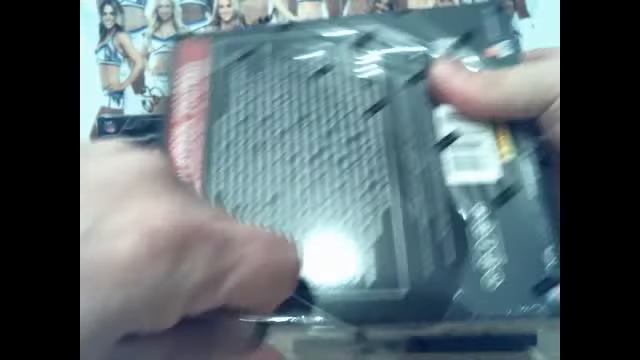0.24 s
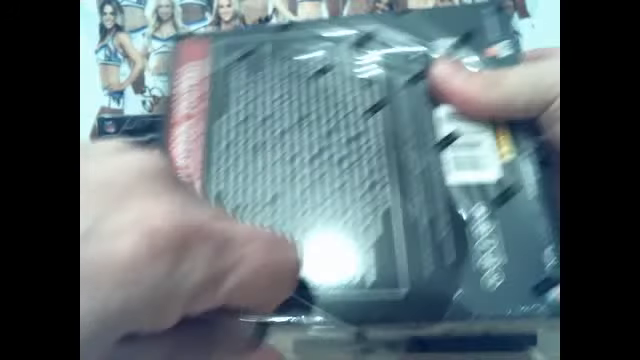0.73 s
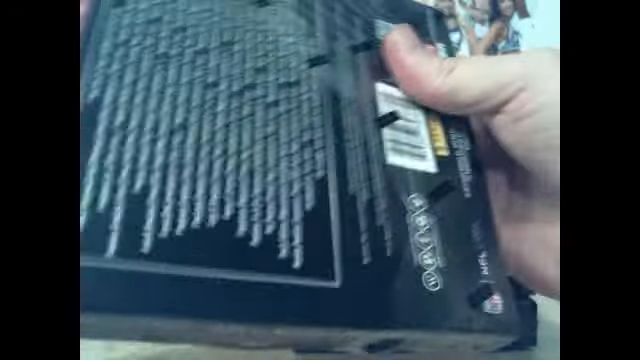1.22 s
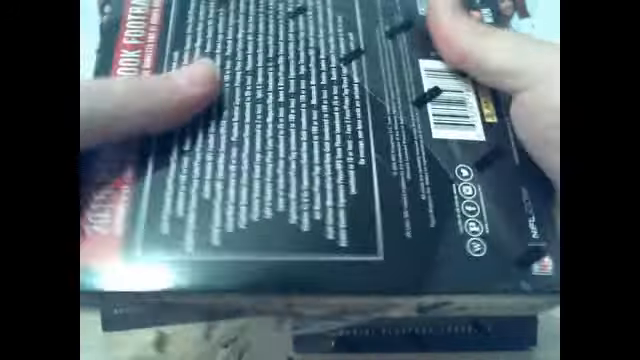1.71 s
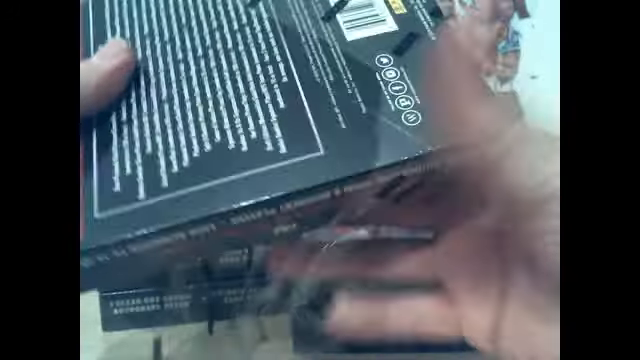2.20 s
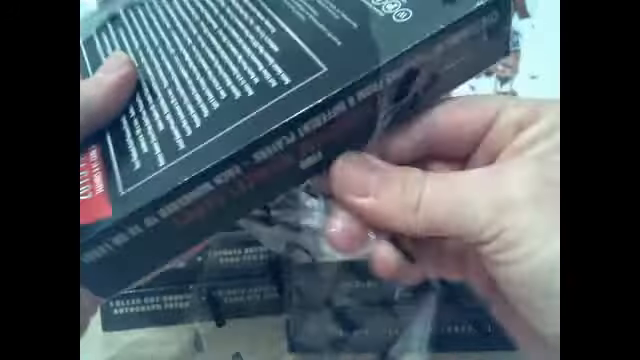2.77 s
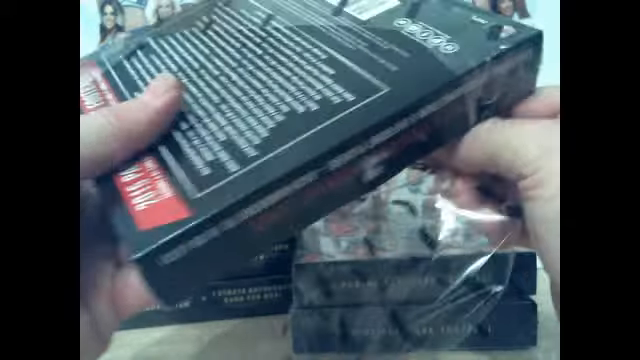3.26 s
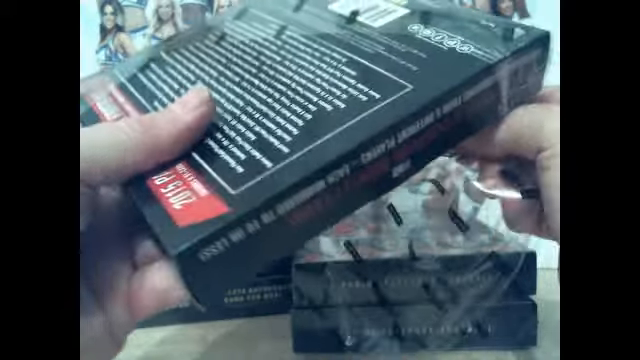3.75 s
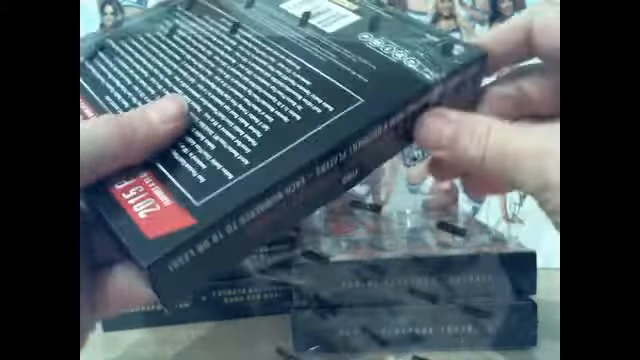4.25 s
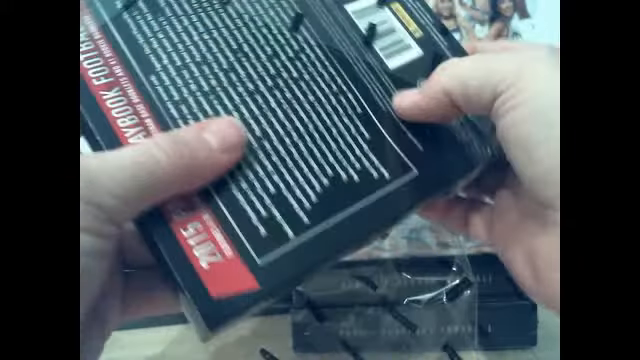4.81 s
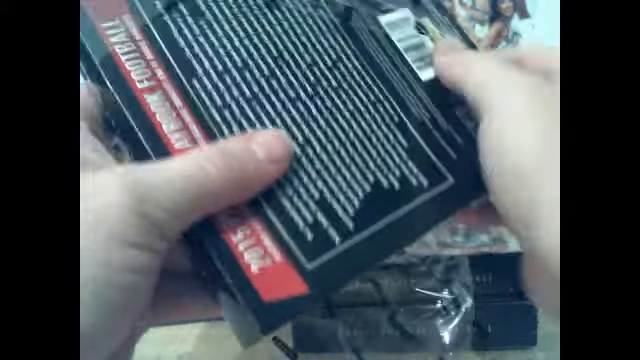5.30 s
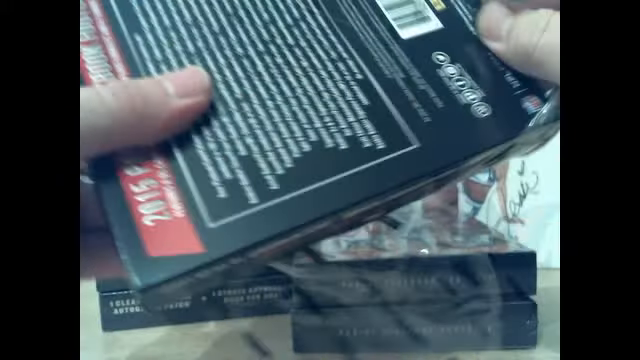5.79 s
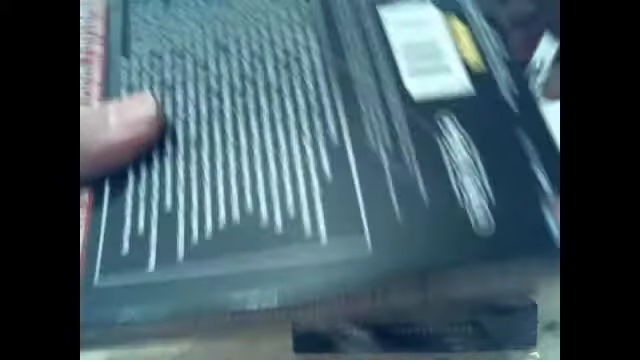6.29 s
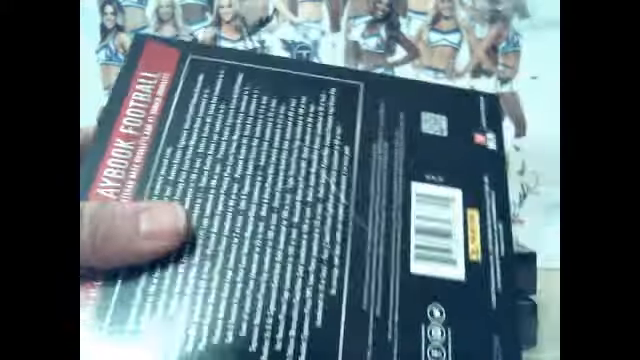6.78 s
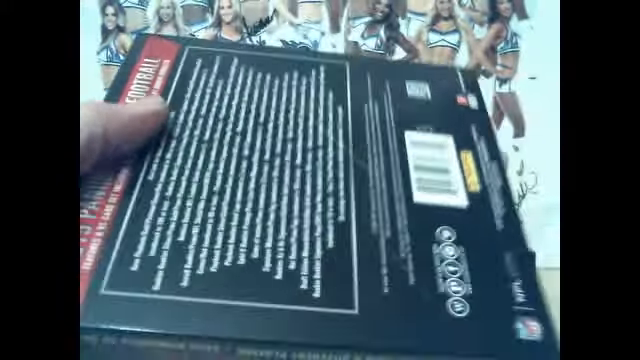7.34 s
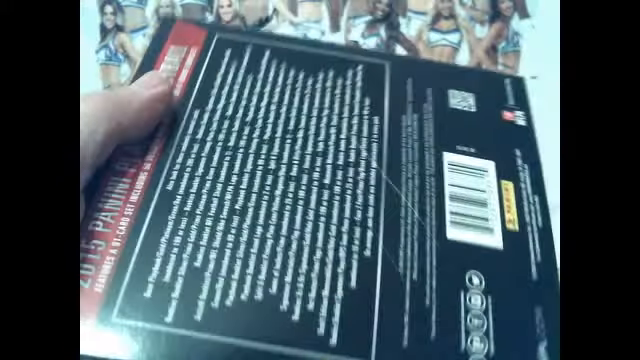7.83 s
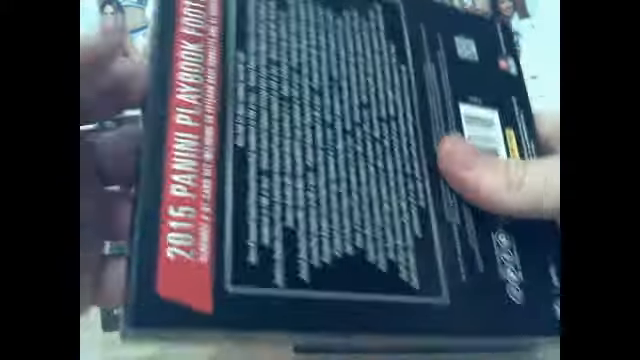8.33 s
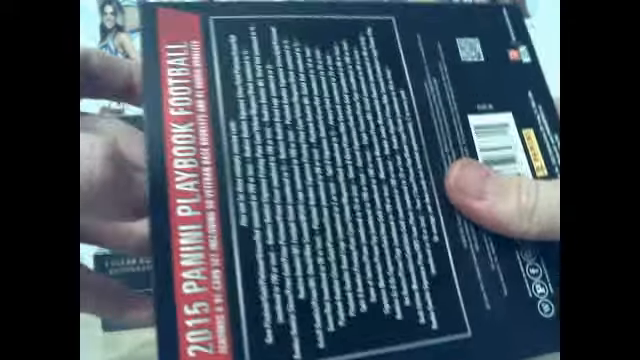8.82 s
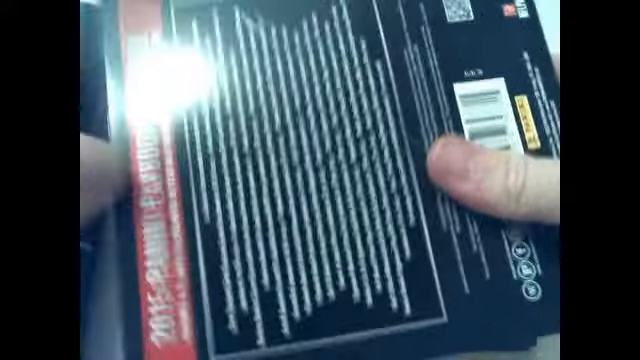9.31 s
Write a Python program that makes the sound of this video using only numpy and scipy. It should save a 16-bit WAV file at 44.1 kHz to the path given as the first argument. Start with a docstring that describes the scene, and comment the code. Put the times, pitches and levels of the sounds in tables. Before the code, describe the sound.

Close crackling of shrink-wrap being ripped from a cardboard box in short tugs, followed by fingers rubbing and bumping the lid open.

```python
"""Thin shrink film is picked, ripped and crumpled off a sealed cardboard box, close to a small microphone.
The film buckles: large creases snap singly, and countless tiny ones merge into a rustle.
Tugs and knocks excite the air cavity of the box, its walls flex with soft thumps, and fingertips
rub and squeak by stick-slip friction. At last the bare lid is eased open, over a quiet room rumble."""
import sys
import numpy as np
from scipy import signal
from scipy.fft import rfft, irfft, next_fast_len
from scipy.io import wavfile
from scipy.ndimage import uniform_filter1d

SR = 44100
rng = np.random.default_rng(int(sys.argv[2]) if len(sys.argv) > 2 else 0)


def bounce(signal):
    """Save signal as a 16-bit WAV file at the path given by the first command-line argument."""
    frames = np.transpose(np.atleast_2d(signal))
    limited = np.clip(frames, -1, 1)
    pcm = np.round(limited * 32767).astype(np.int16)
    wavfile.write(sys.argv[1], SR, pcm)


N = 421155

# Spectra of the room's rumble and hush, the film's broad folds and fine wrinkles, and rubbed card.
# Each row: frequency in Hz, relative spectral density in dB.
RUMBLE_SPECTRUM = [(13, -31.5), (22, 1), (27, 4), (43, -1), (123, -2), (141, -6), (173, -7.5), (190, -9),
                   (257, -10.5), (293, -13), (500, -19), (650, -42), (1100, -120)]
HUSH_SPECTRUM = [(180, -24.5), (300, 4), (511, -14.5), (656, -12), (1410, -5.5), (3700, -13.5),
                 (4370, -35.5), (10700, -24), (16000, -21.5)]
FOLD_SPECTRUM = [(700, -14.5), (1200, -8.5), (2200, -1.5), (3500, -2), (6000, -9), (9000, -14)]
WRINKLE_SPECTRUM = [(3500, -17.5), (6000, 0.5), (8000, -0.5), (10500, -1), (13000, -5), (16000, -26.5)]
CARD_SPECTRUM = [(150, -10), (300, -1), (500, -4), (600, 0), (690, -2), (800, -6.5), (1050, -8.5),
                 (1280, -8.5), (1800, -14), (3000, -22.5)]
# Finger movements. Each row: start in seconds, length in seconds, initial rustle level in dB,
# its change over the movement in dB, fine treble and card rubbing in dB relative to the rustle.
FINGER_MOVES = [(0, 0.19, -46, -3, -5.5, -2), (0.089, 0.29, -34.5, -16.5, -3, -2),
                (0.399, 0.067, -40.5, -3.5, -2.5, -2), (0.48, 0.12, -64.5, 15, -3.5, -3),
                (0.609, 0.13, -33.5, -22.5, -2, -1), (0.715, 0.22, -60, 8.5, 1, -3.5),
                (0.966, 0.16, -59.5, -3, 0.5, -3), (1.115, 0.2, -56.5, 5.5, 0, -3.5),
                (1.341, 0.089, -62.5, 1, -1, 1.5), (1.634, 0.13, -55, -2, -2, 1),
                (1.809, 0.076, -48, -18.5, -4, 0), (1.895, 0.11, -61.5, 3, -1, 0),
                (2.031, 0.053, -68.5, 15, 2.5, 1.5), (2.127, 0.046, -55, -12, 2, 2),
                (2.197, 0.03, -49.5, -8.5, 0, -4), (2.249, 0.11, -65, 8.5, 1, 1),
                (2.406, 0.14, -57, 6.5, -1, 0), (2.576, 0.27, -50, -3, -5, -1.5),
                (2.87, 0.046, -51.5, -11.5, 1, 0), (2.94, 0.13, -56.5, -0.5, 1, -8),
                (3.105, 0.067, -63, 0, -3, -1.5), (3.2, 0.18, -66, -3, -10, 0.5),
                (3.382, 0.12, -76, 8, -3, 9.5), (3.606, 0.14, -58.5, -1, -1.5, -5.5),
                (3.727, 0.048, -38, -13, -4.5, -4.5), (3.777, 0.094, -60, 7.5, -8, -1.5),
                (3.9, 0.099, -73, 4, -14, 4.5), (4.051, 0.23, -54.5, -2.5, -4.5, -3),
                (4.37, 0.068, -62, -15, -4, 2), (4.428, 0.062, -58, 2, -7, 2),
                (4.526, 0.059, -71, 9, -6, 8), (4.605, 0.14, -55.5, -9.5, -2, 2.5),
                (4.844, 0.11, -58, -6, -6, 2.5), (5.013, 0.17, -55.5, 1, -1, 0),
                (5.193, 0.3, -59.5, 0, -5, -4), (5.51, 0.13, -48.5, -21, -13, -4),
                (5.641, 0.15, -69, 16.5, -2.5, -2.5), (5.813, 0.09, -40, -22, -7, 11),
                (5.893, 0.17, -51.5, 4, -5.5, -2.5), (6.049, 0.15, -34, -9.5, -6, -8),
                (6.197, 0.3, -42, -2.5, 0, -5.5), (6.543, 0.29, -47, -10.5, -2.5, -23),
                (6.854, 0.11, -66.5, -1.5, -2.5, -5), (6.967, 0.24, -64.5, -7.5, -1.5, 1),
                (7.206, 0.12, -65, -6, -6, 3), (7.35, 0.16, -69, -12, 0.5, 4.5),
                (7.72, 0.16, -64.5, -5.5, -4.5, -0.5), (7.954, 0.086, -68.5, -10.5, -16, 0.5),
                (8.07, 0.12, -46.5, -22, -10, 6.5), (8.259, 0.15, -59.5, -10, -4.5, 0.5),
                (8.47, 0.2, -68.5, -6.5, -12, 12), (8.686, 0.14, -60.5, -13, -23.5, 11),
                (8.842, 0.057, -66, -13, -18, 23.5), (8.952, 0.044, -70.5, -0.5, -12.5, 11),
                (8.992, 0.16, -35.5, -32.5, -18, 8), (9.17, 0.045, -52, -7, -10.5, 1.5),
                (9.248, 0.11, -72, 4, -4.5, 0.5), (9.413, 0.094, -61, 5, -9.5, 0.5)]
# Levels between movements: rustle, fine treble and card rubbing, each in dB.
RESTING_DB = [-75.5, -83, -69.5]
# Tugs and knocks on the box. Each row: start in seconds, peak level of the cavity ring in dB,
# peak of the card's crack in dB relative to the ring.
BOX_KNOCKS = [(.092, -28, -4), (.108, -29, 2), (.145, -19, -10), (.236, -29.5, 3.5), (0.416, -35, 1),
              (.439, -28.5, 5), (.462, -28.5, 3.5), (.614, -7, -3), (.648, -24.5, 0.5), (1.69, -36.5, 1),
              (2.061, -39, -18), (2.498, -43, 12), (2.54, -39, -2), (2.751, -34, 7), (2.998, -41, 1.5),
              (3.06, -41.5, -7), (3.274, -41.5, 3.5), (3.729, -41, 0), (4.075, -38, 3), (4.497, -33, -5),
              (4.612, -31, 2.5), (5.005, -28.5, -14), (5.178, -41.5, 3), (5.515, -35, 14),
              (5.811, -26, -15), (5.825, -7, -9), (6.054, -28, 4), (6.072, -18, 6.5), (6.107, -15.5, 1.5),
              (6.344, -33, 6.5), (6.443, -31.5, 2.5), (6.486, -28.5, -4), (7.413, -53.5, -14.5),
              (7.455, -49.5, -15), (7.479, -45, -15), (8.098, -24.5, 0), (8.253, -27.5, -7.5),
              (8.381, -38.5, -28), (8.757, -35.5, -7), (8.845, -22.5, -38), (8.916, -37.5, -18),
              (8.996, -24, -13), (9.012, -22.5, -18), (9.039, -18.5, 10), (9.047, -14.5, -3),
              (9.197, -37.5, 2.5), (9.431, -38.5, -3.5)]
# Modes of the air in the box. Each row: frequency in Hz, relative level in dB, 60 dB decay time in seconds.
CAVITY_MODES = [(310, -14, .035), (490, -9, .055), (645, 0, .055), (720, -8, .045), (1200, -13, .03)]
# Creases that stand out as single snaps or ticks, first in the film, later in the lid.
# Each row: start in seconds, peak level of the body in dB, centre frequency in Hz,
# treble spit in dB relative to the body.
CREASE_SNAPS = [(.0943, -19, 4500, -18), (.099, -24.5, 4640, -12), (.1093, -16, 4300, -2),
                (.1283, -12, 7600, -5), (.1454, -1.5, 3440, -5), (.1543, -23.5, 3460, -24),
                (.2288, -25, 9500, -12), (.2414, -23, 3220, -1.5), (.2582, -24.5, 6170, -11),
                (.2954, -23.5, 2830, -7), (.349, -30.5, 9950, 4), (.4056, -23, 3860, -6),
                (.4171, -22, 1930, -6), (.4426, -27, 1980, -17), (.4634, -25.5, 8300, -11),
                (.6148, 3, 5620, -5), (.6237, -14, 2740, -15), (.647, -21.5, 9860, 4.5),
                (.6725, -23.5, 7200, -6), (.7393, -36, 8200, -10), (.8249, -35, 4800, -14),
                (.8373, -33, 7100, -15), (.873, -23.5, 7700, -4.5), (.9143, -29.5, 6890, -12),
                (.9474, -38, 6900, -6), (.9825, -30.5, 5740, -6), (1.0245, -33, 7440, -24),
                (1.1238, -33, 9170, -11), (1.1956, -34, 3370, -18), (1.237, -27.5, 3240, 0),
                (1.2644, -34, 6980, -23), (1.6458, -34.5, 2660, -1.5), (1.6907, -36, 1760, -11),
                (1.8211, -41, 1570, -1), (1.8576, -41, 6300, -15), (1.9378, -34.5, 2780, -4),
                (1.99, -36.5, 2240, -10), (2.1503, -34, 6700, -9), (2.2133, -31.5, 6800, -13),
                (2.4736, -32.5, 10600, -5), (2.4981, -31.5, 1450, -28), (2.5412, -36, 2740, -3),
                (2.6043, -31, 9730, -10), (2.6294, -29.5, 6000, -9), (2.6588, -30, 6060, -8),
                (2.6776, -33, 7800, -9), (2.7165, -32.5, 10340, -12), (2.7513, -24, 2250, -0.5),
                (2.7705, -31, 10600, -7), (2.7843, -23.5, 9800, -12), (2.8253, -31.5, 8500, 0.5),
                (2.9354, -41.5, 4300, 5), (3.027, -32, 11020, -13), (3.0712, -34, 11100, -13),
                (3.1188, -38.5, 2580, 0), (3.1483, -34, 4130, -5), (3.2155, -35, 4050, 0.5),
                (3.251, -40.5, 4330, -9), (3.3464, -48, 6960, -1), (3.3746, -42, 4970, -0.5),
                (3.409, -39.5, 2950, -8), (3.4332, -36.5, 1490, 2), (3.47, -39, 4560, -5),
                (3.4933, -35.5, 2610, -6), (3.5404, -43, 6750, -13), (3.585, -40.5, 2230, -8),
                (3.7328, -19.5, 3120, -6), (3.7491, -26, 5580, -5), (3.92, -44, 1800, 1.5),
                (3.9935, -36, 3450, -24), (4.0535, -42, 1520, -11), (4.0761, -34.5, 3790, -13),
                (4.232, -36, 4640, -8), (4.2509, -40, 2540, -5), (4.2674, -39, 10100, -17),
                (4.2803, -39, 1470, -13), (4.5322, -40, 4750, -20), (4.6135, -29.5, 1640, -8),
                (4.7376, -50, 3400, 1.5), (4.7507, -43, 3450, -5), (5.0064, -31, 1510, -18.5),
                (5.1796, -31, 3830, -5), (5.2594, -41, 7850, -25), (5.5167, -17, 2240, -18.5),
                (5.5259, -32, 2400, -34), (5.5925, -29, 2410, -5.5), (5.6366, -42.5, 6900, -13),
                (5.7794, -41, 3170, 3), (5.8129, -27, 1490, -15), (5.8283, -19, 1410, -10),
                (5.9156, -22, 3400, -5), (5.9597, -29.5, 3320, -25), (5.9693, -26, 3200, -17),
                (6.056, -24.5, 3490, -7), (6.0737, -14, 3320, -24), (6.0864, -26.5, 3060, -17),
                (6.1025, -11.5, 2740, -10), (6.1082, 2, 3730, -10.5), (6.1161, -14.5, 3840, -21),
                (6.1464, -19, 5450, -14), (6.177, -24.5, 7540, -17), (6.2254, -24, 4000, -14),
                (6.2412, -16, 5800, -14), (6.2583, -23, 4180, -8), (6.2877, -22.5, 4680, -22),
                (6.3329, -22, 5700, -6), (6.3522, -20, 7300, -7), (6.3824, -23, 5210, -3),
                (6.4452, -26, 3430, -1), (6.4946, -26, 1850, -10), (6.5607, -36, 3500, -15),
                (6.6215, -31, 5900, -15), (6.6808, -35, 5680, -16), (6.7154, -29.5, 4370, -4.5),
                (6.7286, -31.5, 5220, -11), (6.7651, -39, 3700, -17), (6.7987, -37, 3900, -18),
                (6.9, -46, 5410, -9), (6.968, -46.5, 5940, -6.5), (7.025, -47, 6000, -7),
                (7.241, -44, 1993, -5), (8.0754, -33, 2600, -5), (8.0994, -27.5, 1570, -8.5),
                (8.2548, -35, 1716, -9), (8.45, -50.5, 3000, -22), (8.756, -47.5, 5010, -6),
                (8.813, -58, 4960, -6), (8.827, -55, 3000, -13), (8.8461, -35.5, 1510, -25),
                (9.0031, -26.5, 7190, -12), (9.0236, -13.5, 3230, -25), (9.025, -15.5, 2070, -14),
                (9.0442, -12, 2330, -10.5), (9.2012, -41, 1744, -14), (9.435, -46.5, 2400, -4.5),
                (9.447, -45, 4000, -7), (9.5039, -36, 4200, -8.5)]
# Palm or table meeting the large walls. Each row: start in seconds, peak level in dB, frequency in Hz.
WALL_THUMPS = [(0.146, -42, 86), (0.409, -35.5, 133), (0.613, -38, 54), (0.668, -33, 59),
               (1.224, -35, 47.7), (1.401, -42, 59), (1.647, -33.5, 108), (1.692, -39, 52.4),
               (1.928, -43, 117), (2.057, -45, 43), (2.112, -41, 53.7), (2.539, -46.5, 113),
               (2.761, -41, 132), (3.727, -36, 231), (4.488, -46, 141), (4.61, -27.5, 264),
               (5.003, -43.5, 146), (5.724, -34, 152), (5.822, -15, 140), (6.051, -27.5, 267),
               (6.106, -20.5, 266), (6.265, -33.5, 225), (6.491, -36.5, 118), (8.104, -34, 37),
               (8.258, -40, 59), (8.697, -37, 138.5), (8.756, -42.5, 129), (8.786, -37, 200),
               (9.0, -33, 134), (9.04, -20, 193), (9.045, -25.5, 42), (9.13, -43, 44.8), (9.43, -41, 140)]
# Squeaky fingertip rubs. Each row: start in seconds, length in seconds, pitch in Hz, level in dB.
FINGER_SQUEAKS = [(1.808, 0.033, 1480, -57), (2.25, .05, 1250, -61.5), (2.408, 0.064, 1300, -52),
                  (3.201, 0.1, 1400, -66), (4.102, 0.22, 1270, -61.5), (4.362, 0.033, 1345, -62.5),
                  (4.62, 0.13, 680, -62), (4.851, 0.12, 680, -60), (5.022, 0.1, 1280, -56),
                  (5.522, 0.046, 2300, -52), (9.181, .04, 1960, -55), (9.468, 0.065, 2950, -54),
                  (9.477, 0.044, 4700, -59)]

FILM_GONE_S, LID_LIFTS_S = 7.55, 8.2


def undb(db):
    """Amplitude ratio of a level in dB."""
    return 10 ** (np.asarray(db) / 20)


def unit(x):
    """Scale to rms 1."""
    return x / np.sqrt(np.mean(x ** 2))


def peak(x, db):
    """Scale to a peak level."""
    return x * undb(db) / np.abs(x).max()


def add(out, start_s, x):
    """Superpose x on out from start_s."""
    i = max(int(start_s * SR), 0)
    out[i:i + len(x)] += x[:N - i]


def decay(t, t60):
    """Exponential damping, 60 dB in t60 seconds."""
    return 1000. ** (-t / t60)


def band(x, hz, width_hz):
    """Two-pole resonance with gain 1 at the centre."""
    hz = min(hz, .4 * SR)
    return signal.lfilter(*signal.iirpeak(hz, hz / width_hz, SR), x)


def steep_band(x, hz, width_hz):
    """Two equal resonances in cascade."""
    return band(band(x, hz, width_hz), hz, width_hz)


def colour(x, spectrum):
    """Spectral shaping through (Hz, dB) points, scaled to rms 1."""
    hz, db = np.transpose(spectrum)
    size = next_fast_len(len(x))
    bin_hz = np.arange(size // 2 + 1) * SR / size + 1
    gain = undb(np.interp(np.log(bin_hz), np.log(hz), db, -90, -90))
    return unit(irfft(rfft(x, size) * gain, size)[:len(x)])


def wander(per_s):
    """Random modulation: ramps between per_s values a second, standard deviation near 0.7."""
    hold = int(SR / per_s)
    steps = np.repeat(rng.standard_normal(N // hold + 1), hold)
    return 0.83 * uniform_filter1d(steps, hold)[:N]


def room_noise(rumble_db=-54, hush_db=-73.5):
    """Ambient noise: a low rumble with slow amplitude modulation, and a faint steady hush."""
    rumble = colour(rng.standard_normal(N), RUMBLE_SPECTRUM) * undb(rumble_db + 1.5 * wander(6))
    hush = colour(rng.standard_normal(N), HUSH_SPECTRUM) * undb(hush_db)
    return rumble + hush


def finger_levels(attack_s=0.0076, release_s=0.018):
    """Incoherent sounds add in power: the movements sum to rustle, treble and rubbing envelopes in dB."""
    power = np.zeros((3, N)) + undb(RESTING_DB)[:, None] ** 2
    for start, length, db, change_db, fine_db, card_db in FINGER_MOVES:
        t = np.arange(int((length + 4 * release_s) * SR)) / SR
        attack = np.minimum(t / attack_s, 1)
        release = np.exp(-np.maximum(t - length, 0) / release_s)
        envelope = undb(db + change_db * np.minimum(t / length, 1)) * attack * release
        for layer, share_db in zip(power, (0, fine_db, card_db)):
            add(layer, start, (envelope * undb(share_db)) ** 2)
    return 10 * np.log10(power)


def crackle(per_s, spread_db, t60, hiss_db):
    """A Poisson process: tiny buckles or slips of uneven size, each a damped noise, over sliding hiss."""
    sizes = undb(np.minimum(spread_db * rng.exponential(size=N), 14))
    impulses = (rng.random(N) < per_s / SR) * sizes
    envelope = signal.lfilter([1], [1, -decay(1 / SR, t60)], impulses)
    return (unit(envelope) + undb(hiss_db)) * rng.standard_normal(N)


def shifting_patches(x, centres_hz, depth):
    """Patches of film radiate in turn, so each band is modulated independently."""
    return unit(sum(band(x, hz, 0.67 * hz) * undb(depth * wander(30)) for hz in centres_hz))


def rustle(rustle_db, fine_db):
    """Folds and wrinkles buckle, partly together; with the film off, skin slides with smooth friction."""
    shared = crackle(per_s=140, spread_db=1, t60=0.015, hiss_db=-5)
    folds = shared + 0.62 * crackle(per_s=200, spread_db=0.5, t60=0.015, hiss_db=-5.5)
    wrinkles = shared + 0.27 * crackle(per_s=310, spread_db=1, t60=0.007, hiss_db=-2)
    bare = np.arange(N) > FILM_GONE_S * SR
    folds, wrinkles = (np.where(bare, rng.standard_normal(N), unit(x)) for x in (folds, wrinkles))
    folds = colour(shifting_patches(folds, [1200, 2200, 3520, 5650], depth=2), FOLD_SPECTRUM)
    wrinkles = colour(shifting_patches(wrinkles, [6000, 8100, 12100, 16000], depth=4), WRINKLE_SPECTRUM)
    jerks_db = wander(40)
    return folds * undb(rustle_db + jerks_db) + wrinkles * undb(fine_db + jerks_db)


def card_rubbing(card_db, cavity_hz=680, width_hz=137, cavity_db=-5):
    """Friction: skin slips on card in small jerks, which drive a cavity resonance once the lid lifts."""
    slips = crackle(per_s=90, spread_db=5, t60=0.093, hiss_db=0)
    cavity = unit(band(band(slips, cavity_hz, width_hz), cavity_hz, 2 * width_hz))
    lid_open = np.arange(N) > LID_LIFTS_S * SR
    rubbing = colour(slips, CARD_SPECTRUM) + undb(cavity_db) * cavity * lid_open
    return rubbing * undb(card_db + 2.1 * wander(20))


def cavity_response(t, scatter_db=2.5, detune=.015):
    """A sum of damped normal modes; each blow lands elsewhere and weights them anew."""
    response = np.zeros(len(t))
    for hz, db, t60 in CAVITY_MODES:
        level_draw, pitch_draw = rng.standard_normal(2)
        mode = np.sin(2 * np.pi * hz * (1 + detune * pitch_draw) * t)
        response += undb(db + scatter_db * level_draw) * mode * decay(t, t60)
    return response


def box_knocks(contact_s=.0035, crack_t60=0.022):
    """Impact excitation: a short rough push rings the air cavity, and the stiff card cracks drily."""
    out, t = np.zeros(N), np.arange(5000) / SR
    push_t = t[:900]
    progress = push_t / contact_s
    for start, db, crack_db in BOX_KNOCKS:
        push = progress * np.exp(-3 * progress) * (rng.standard_normal(len(push_t)) + 0.44)
        ring = signal.fftconvolve(push, cavity_response(t))
        add(out, start, peak(band(ring, 700, 1800), db))
        grit = 0.6 * rng.standard_normal(len(push_t)) * decay(push_t, crack_t60)
        crack = steep_band(push + grit * np.abs(push).max(), 1600, 1800)
        add(out, start, peak(crack, db + crack_db))
    return out


def crease_snaps(creases, film_t60=0.0065, lid_t60=0.015, flutter_db=-26):
    """Snap-through buckling: each crease emits a coloured crack, then its neighbours flutter on."""
    out, t = np.zeros(N), np.arange(2600) / SR
    for start, db, hz, spit_db in creases:
        t60 = (film_t60 if start < FILM_GONE_S else lid_t60) * np.exp(0.19 * rng.standard_normal())
        flutter = undb(flutter_db) * decay(t, 6.4 * t60)
        attack = 1 - np.exp(-t / (0.019 * t60))
        envelope = attack * (decay(t, t60) + flutter)
        crack = rng.standard_normal(len(t)) * envelope
        # a crack with little spit comes from a taut or thick spot: it rings narrower, nearly a ping
        q = 1.6 * undb(-.4 * spit_db)
        resonance = np.sqrt(q) * steep_band(crack, hz, hz / q)
        ping = undb(-12.5 - .6 * spit_db) * np.sin(2 * np.pi * hz * t) * envelope
        broadband = undb(-3 + .6 * spit_db) * band(crack, 1900, 3500)
        body = resonance + ping + broadband
        spit = steep_band(crack, 8500, 5000)
        add(out, start, peak(body, db) + peak(spit, db + spit_db))
    return signal.sosfilt(signal.butter(4, 12000, fs=SR, output="sos"), out)


def small_creases(rustle_db, per_s=20, above_rustle_db=5.5, spread_db=3.5):
    """Random buckling while the film is on: small snaps whose strength follows the rustle."""
    when, size, tone, spit = rng.random((int(per_s * FILM_GONE_S), 4)).T
    starts = when * FILM_GONE_S
    excess_db = np.minimum(-spread_db * np.log(1 - size), 8)
    levels_db = rustle_db[(starts * SR).astype(int)] + above_rustle_db + excess_db
    return crease_snaps(zip(starts, levels_db, 1500 * 6.5 ** tone, -16 * spit))


def reverberation(x, t60=0.31, gap_s=.004, wet_db=-24):
    """Diffuse reflections in a small furnished room: a dull, decaying tail after a short gap."""
    t = np.arange(int(.4 * SR)) / SR
    tail = band(rng.standard_normal(len(t)), 1000, 2700) * decay(t, t60) * (t > gap_s)
    tail /= np.sqrt(np.sum(tail ** 2))
    return signal.fftconvolve(x, tail)[:N] * undb(wet_db)


def wall_thumps(t60_cycles=4.5, rise_s=.004):
    """Flexural vibration of a wall, heavily damped by the hands; little radiates far below its pitch."""
    out, t = np.zeros(N), np.arange(9000) / SR
    attack = 1 - np.exp(-t / rise_s)
    for start, db, hz in WALL_THUMPS:
        flex = np.sin(2 * np.pi * hz * t) * decay(t, t60_cycles / hz) * attack
        add(out, start, peak(band(flex, hz, 2.5 * hz), db))
    return out


def finger_squeaks(q=5.6):
    """Stick-slip friction of skin: a narrow, unsteady resonance swells and fades."""
    out = np.zeros(N)
    for start, length, hz, db in FINGER_SQUEAKS:
        friction = rng.standard_normal(int(length * SR))
        tone = band(band(friction, hz, hz / q), hz, 2 * hz / q)
        swell = np.sqrt(np.hanning(len(tone)))
        add(out, start, unit(tone) * swell * undb(db))
    return out * undb(3.5 * wander(60))


def scene():
    """Superposition of all sources in one channel; only snaps and knocks reverberate."""
    rustle_db, fine_db, card_db = finger_levels()
    hits = crease_snaps(CREASE_SNAPS) + box_knocks() + small_creases(rustle_db)
    handling = rustle(rustle_db, fine_db) + card_rubbing(card_db) + finger_squeaks()
    return (hits + reverberation(hits) + wall_thumps() + handling + room_noise())[None]


def record(dry, capsule_hz=13600, full_scale=.6, dc_offset=.0055, cutoff_hz=16000):
    """Transduction: the capsule dulls the treble; the converter clips, sits off zero and limits the band."""
    dull = signal.sosfilt(signal.butter(2, capsule_hz, fs=SR, output="sos"), dry)
    clipped = np.clip(dull, -full_scale, full_scale) + dc_offset
    return signal.sosfilt(signal.ellip(10, .2, 80, cutoff_hz, fs=SR, output="sos"), clipped)


dry = scene()
out = record(dry)
bounce(out)
```